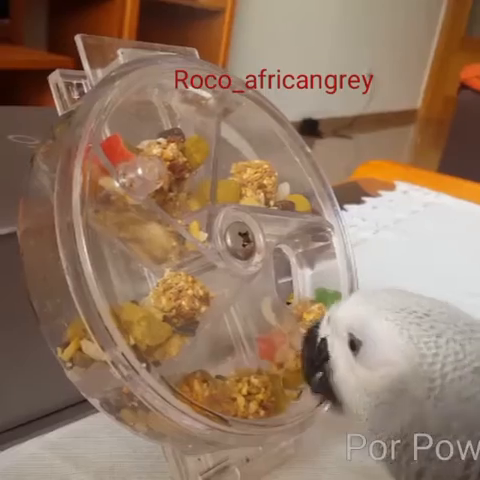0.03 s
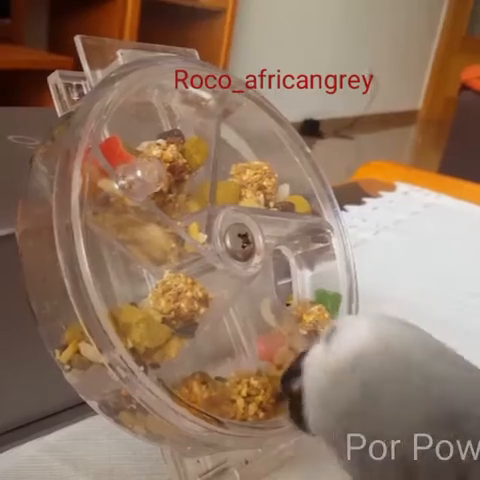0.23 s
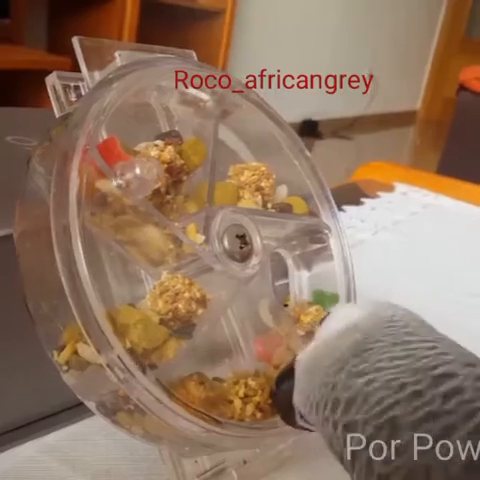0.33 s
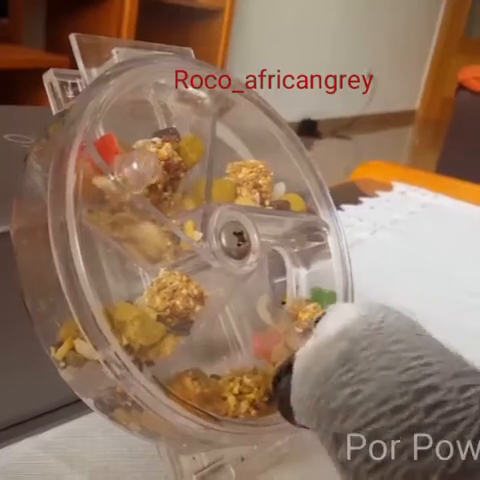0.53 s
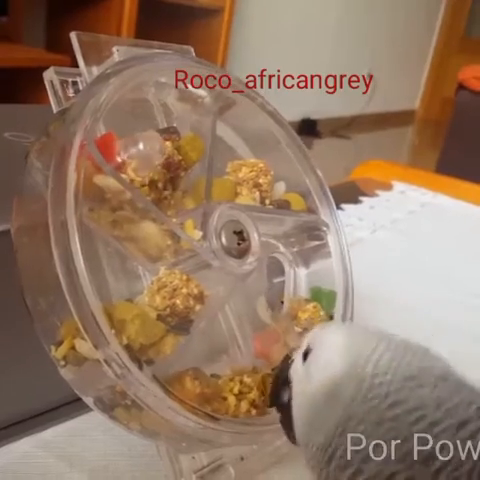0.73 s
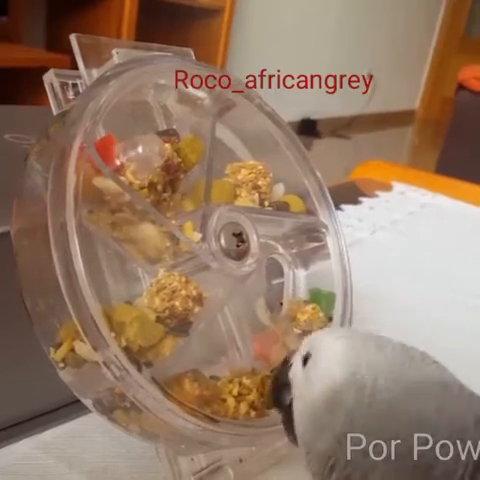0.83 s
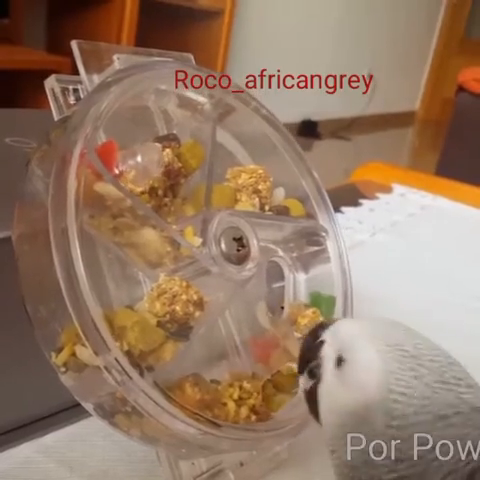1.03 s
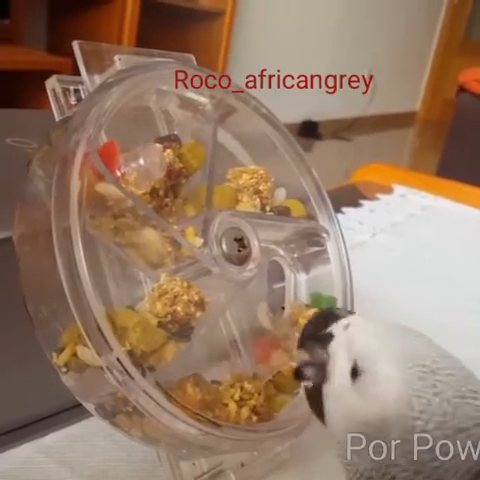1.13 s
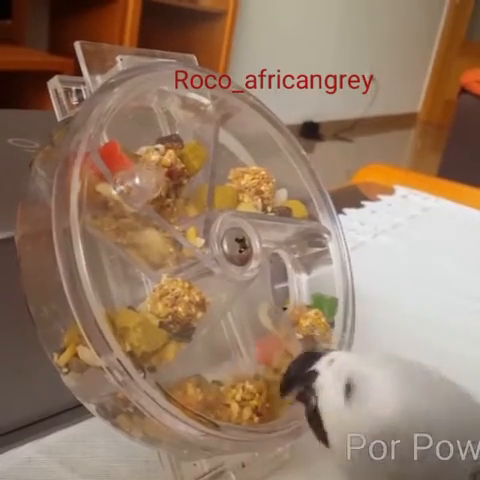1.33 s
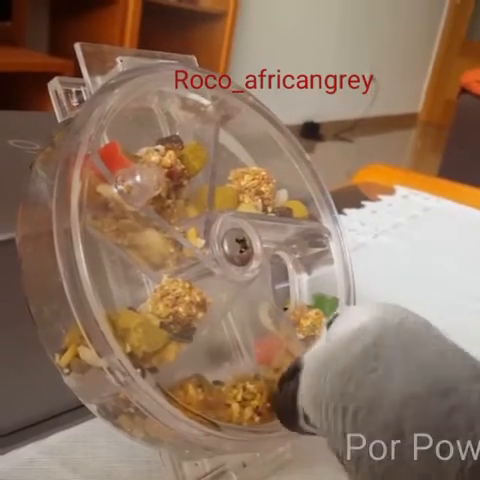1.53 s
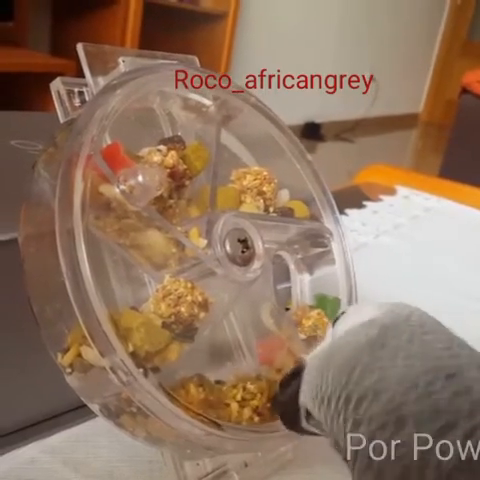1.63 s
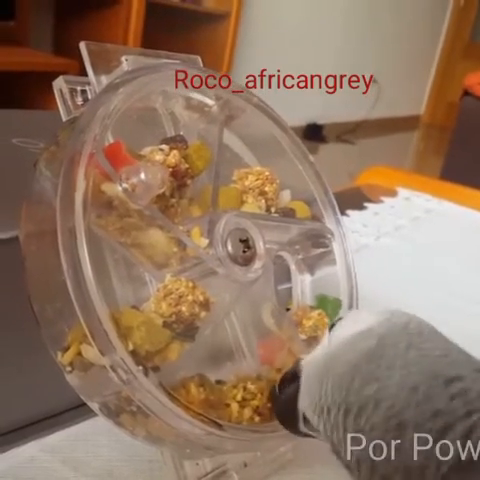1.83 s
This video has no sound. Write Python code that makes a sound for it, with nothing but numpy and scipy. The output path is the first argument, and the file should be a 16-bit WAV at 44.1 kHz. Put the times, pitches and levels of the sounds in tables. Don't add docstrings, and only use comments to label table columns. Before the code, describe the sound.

Hollow plastic knocks and bright clicks from a beak on a nut-filled wheel, first a dense loud clatter, then sparser hits and lighter taps, with faint room tone, heard close in a small indoor space.

```python
import sys
import numpy as np
from scipy import signal
from scipy.io import wavfile
from scipy.ndimage import map_coordinates

SR = 44100
rng = np.random.default_rng(int(sys.argv[2]) if len(sys.argv) > 2 else 0)


def master_out(mix):
    frames = np.transpose(np.atleast_2d(mix))
    ceiling = np.clip(frames, -1, 1)
    pcm = np.round(ceiling * 32767).astype(np.int16)
    wavfile.write(sys.argv[1], SR, pcm)


def gain_from_db(level_db):
    decades = np.asarray(level_db, float) / 20
    return 10 ** decades


N = 83790

# pitch in Hz, level in dB, t60 in seconds.
TABLE = [(171.2, -2.5, 0.087), (199.3, -5, 0.23), (350, -14.5, 0.035)]
# pitch in Hz, level in dB, t60 in seconds.
DRUM = [(558, -8.5, 0.038), (638.4, -7, 0.054), (681.5, -4.5, 0.029), (716.7, -10.5, 0.048)]
# pitch in Hz, level in dB, t60 in seconds.
UPPER = [(1061.3, 2.5, 0.049), (1226.6, 1.5, 0.027), (1304, -0.5, 0.033), (1502, -18.5, 0.046),
         (1723, -7.5, 0.026)]
# pitch in Hz, level in dB, t60 in seconds.
RIM = [(1930, -2, .025), (2250, -6, .015), (2590, 1, .018), (2890, -2, .022), (3120, -5, .02),
       (3800, -3, .013), (4400, -6, .013), (5120, -8, .015)]
TABLE_BAND_HZ, SHELL_BAND_HZ, RIM_BAND_HZ = [107.4, 630], [503, 3700], [2350, 6200]


def rms_one(x):
    return x / np.sqrt(np.mean(x ** 2) + 1e-20)


def at_hz(points, hz):
    table_hz, value = np.transpose(points)
    return np.interp(np.log(hz), np.log(table_hz), value)


def over_time(points):
    return gain_from_db(np.interp(np.arange(N) / SR, *np.transpose(points)))


def band(x, edges_hz, order=2):
    return signal.sosfilt(signal.butter(order, edges_hz, "band", fs=SR, output="sos"), x)


def clicks_at(s, size):
    return np.bincount((s * SR).astype(int), size, N)


def ring(clicks, hz, t60):
    radius, w = gain_from_db(-60 / (t60 * SR)), 2 * np.pi * hz / SR
    return signal.lfilter([0, np.sin(w)], [1, -2 * radius * np.cos(w), radius * radius], clicks + 1e-18)


def struck(modes, s, db):
    spread_db = 3.0
    out, luck = 0, rng.standard_normal((len(s), len(modes), 2))
    for k, (hz, level_db, t60) in enumerate(modes):
        strength = gain_from_db(db + level_db + spread_db * luck[:, k, 0])
        out = out + ring(clicks_at(s, strength * np.sign(luck[:, k, 1])), hz, t60)
    return out


def burst(s, db, t60, noise):
    return signal.lfilter([1], [1, -gain_from_db(-60 / (t60 * SR))], clicks_at(s, gain_from_db(db))) * noise


def air():
    # frequency in Hz, level in dB.
    floor = [(35, -43), (60, -21), (77, -8.5), (167, -24.5), (206, -19), (278, -25), (999, -34.5),
             (2530, -41), (15500, -46.5)]
    # frequency in Hz, likeness from 0 to 1.
    likeness = [(60, 0.97), (240, 0.9), (950, 0.2), (3770, 0.06), (15000, -0.01)]
    out, edges = 0, 22 * 2 ** np.arange(0, 9.6, .5)
    white = rng.standard_normal((2, 2, N + SR // 2))
    for k, (low, high) in enumerate(zip(edges, edges[1:])):
        mid, side = band(white[k % 2], [low, high])[:, -N:]
        hz = np.sqrt(low * high)
        alike = np.clip(at_hz(likeness, hz), 0, 1)
        ports = np.sqrt(1 + alike) * mid + np.sqrt(1 - alike) * side * [[1], [-1]]
        out = out + gain_from_db(at_hz(floor, hz)) * ports
    return gain_from_db(-68) * rms_one(out)


def rumble():
    # time in seconds, level in dB.
    handling = [(.5, -62), (1.1, -78), (1.9, -75)]
    noise = band(rng.standard_normal(N + SR), [22, 44])[SR:]
    return over_time(handling) * rms_one(noise)


def nuts():
    # time in seconds, level in dB.
    shaking = [(0,-89),(0.216,-77),(0.259,-53),(.43,-56.5),(.46,-60.5),(.58,-58.5),(.61,-70),(0.796,-57),(0.872,-82),(.92,-58),(1.059,-63.5),(1.199,-78),(1.3,-61.5),(1.42,-61.5),(1.5,-55),(1.67,-64.5)]
    hits_per_s, spread_db = 700, 3.0
    s = np.flatnonzero(rng.random(N) < hits_per_s / SR) / SR
    db = spread_db * np.minimum(rng.exponential(1, N), 3)[:len(s)]
    body = 0
    for modes, part_db, edges_hz in [(TABLE, -0.5, TABLE_BAND_HZ), (DRUM, 2.5, SHELL_BAND_HZ),
                                     (UPPER, 0, SHELL_BAND_HZ), (RIM, -13, RIM_BAND_HZ)]:
        damped = np.array(modes) * [1, 1, 0.24]
        body = body + gain_from_db(part_db) * rms_one(band(struck(damped, s, db), edges_hz))
    grit = rms_one(burst(s, db, 0.087, rng.standard_normal(N)))
    rub = gain_from_db(-6) * band(grit, [1500, 5000], order=1)
    return over_time(shaking) * (body + rub)


def pings():
    # time in seconds, peak in dB, pitch in Hz, t60 in seconds.
    rim_pings = [(0.1187, -67, 3030, 0.018), (0.2335, -31.5, 3990, 0.026), (0.241, -40, 2930, 0.055),
                 (0.2725, -56, 2980, 0.019), (0.8842, -38, 2730, 0.022), (0.313, -54.5, 4565, 0.18),
                 (0.4674, -51, 2420, .02), (0.485, -46, 2260, 0.032), (0.5457, -49, 2880, 0.022),
                 (0.567, -54, 2900, 0.022), (0.6235, -50.5, 2740, 0.04), (0.634, -41, 2480, 0.042),
                 (0.648, -55.5, 2880, 0.048), (0.7363, -54, 2100, .015), (0.748, -54.5, 2780, 0.041),
                 (0.75, -51, 6180, .04), (0.7612, -46.5, 2250, 0.058), (0.762, -56.5, 3840, .025),
                 (0.7845, -53, 2830, 0.033), (1.2431, -35, 2650, 0.017), (1.2445, -48, 3660, 0.017),
                 (1.2765, -45, 2880, 0.032), (1.3673, -47, 2634, 0.018), (1.4412, -38, 3350, 0.027),
                 (1.4425, -38.5, 3960, 0.014), (1.5659, -52.5, 2530, 0.028)]
    # time in seconds, peak in
    # dB, pitch in Hz, t60 in seconds.
    shell_taps = [(0.104, -57.5, 1510, 0.022), (0.2765, -35, 1320, 0.035), (0.467, -26, 1100, 0.021),
                  (0.468, -28.5, 450, 0.074), (0.2238, -25, 1365, 0.023), (0.8846, -27, 1223, 0.041),
                  (0.8855, -24.5, 644, 0.07), (1.2445, -29, 1352, 0.047), (0.636, -36, 664, 0.046),
                  (0.651, -42, 1170, 0.038), (0.763, -36.5, 1460, 0.081), (0.7845, -35.5, 1324, 0.037),
                  (0.7845, -31.5, 726, 0.031), (1.048, -52, 1137, 0.11), (1.143, -58, 1110, 0.023),
                  (1.196, -47, 1073, .02), (1.244, -31, 632, 0.13), (1.2503, -25.5, 650, 0.062),
                  (1.441, -40, 515, 0.062), (1.503, -40, 1140, 0.036), (1.5855, -36, 1114, 0.031),
                  (1.759, -54, 690, 0.021), (1.851, -39, 1213, 0.029)]
    echo_s, echo = 0.001036, 0.56
    out = 0
    for s, db, hz, t60 in [*rim_pings, *shell_taps]:
        touches = clicks_at(np.array([s, s + echo_s]), gain_from_db(db) * np.array([1, echo]))
        out = out + ring(touches, hz, t60)
    return band(out, [SHELL_BAND_HZ[0], 9000])


def knocks():
    # time in seconds, peak in dB, upper shell in
    # dB, crack in dB.
    contacts = [(0.105, -56, -4.5, -15), (0.225, -17.5, -3.5, -11.5), (0.233, -19.5, -1, -7),
                (0.24, -17.5, -7.5, -30), (0.246, -11.5, -16, -26), (0.272, -24.5, -2.5, -11),
                (0.282, -30, -19, -20), (0.312, -30, -5.5, -13), (0.318, -25, -10.5, -21),
                (0.342, -31, -5, -36), (0.372, -32, -35, -36), (0.392, -26.5, -26, -49),
                (0.419, -35, -5.5, -17), (0.467, -18.5, -12.5, -27), (0.484, -26, -18, -30),
                (0.506, -32, -5.5, -30), (0.516, -26, -14.5, -31), (0.542, -27.5, -11, -27),
                (0.55, -33.5, -4.5, -16), (0.568, -28.5, -9, -40), (0.6225, -28.5, -4.5, -25),
                (0.633, -24, -9, -21.5), (0.642, -25, -12, -32), (0.659, -28, -10, -28),
                (0.7358, -26, -22.5, -44), (0.761, -35, -10, -17), (0.786, -31, -2.5, -29),
                   (0.8755, -38, -4.5, -35), (0.8845, -26, -20, -10), (0.8885, -21, -4.5, -16.5),
                   (0.893, -26.5, -13, -27), (0.901, -19, -12.5, -55), (1.015, -39.5, 1, -43),
                   (1.044, -54, 10, -5), (1.08, -33.5, -30, -46), (1.142, -50, -2, -30),
                   (1.197, -53.5, 4, -25), (1.243, -28, 0, -6.5), (1.247, -31.5, -3.5, -11.5),
                   (1.251, -25, -8.5, -50), (1.2766, -38, 3, -16), (1.281, -20, -16.5, -37),
                   (1.35, -32, -3.5, -24.5), (1.36, -37, -0.5, -31), (1.367, -35, 1, -17),
                (1.442, -31, -10, -11.5), (1.465, -26, -23, -30), (1.474, -31.5, -13.5, -28),
                  (1.486, -30, -17, -29), (1.499, -37, -5.5, -40), (1.511, -38, -0.5, -8),
                  (1.538, -42.5, -5, -32), (1.567, -29, -15.5, -32), (1.585, -24, -15, -49),
                  (1.607, -39, -3, -30), (1.624, -34, -17, -34), (1.68, -39, -26, -32),
                  (1.705, -34, -15, -27), (1.723, -35.5, -7, -13.5), (1.759, -38.5, -13, -38),
                  (1.771, -34, -22, -20.5), (1.784, -39, -13, -19), (1.852, -43, 6, -10.5),
                  (1.891, -29, -11.5, -30)]
    chatter_s, chatter_loss_db = 0.001721, 1
    rows = np.repeat(np.array(contacts), 3, axis=0)
    s, db, upper_db, crack_db = rows.T
    touch = np.arange(len(s)) % 3
    s = s + chatter_s * touch * (1 + (rng.random(len(s)) - .5) / 2)
    db = db - chatter_loss_db * touch
    shell = struck(DRUM, s, db - 10) + struck(UPPER, s, db + upper_db - 10)
    first_s, crack_db = s[::3], (db + crack_db)[::3]
    rim = band(struck(RIM, first_s, crack_db - 3.5), RIM_BAND_HZ)
    crack = burst(first_s, crack_db - 2, .035, rng.standard_normal(N))
    buzz = gain_from_db(-31) * sum(gain_from_db(level_db) * ring(crack, hz, t60) for hz, level_db, t60 in RIM)
    return band(shell, SHELL_BAND_HZ) + rim + band(buzz, RIM_BAND_HZ) + band(crack, [1500, 5700])


def scrapes():
    # start in seconds, length in seconds, level in dB, top frequency in Hz.
    strokes = [(0.167, 0.039, -59.5, 6240), (0.25, 0.12, -58, 5800), (0.49, 0.061, -62.5, 7000),
               (0.735, 0.047, -57, 6500), (0.9, 0.051, -75, 3970), (0.999, 0.081, -65, 6200),
               (1.407, 0.11, -64, 8900)]
    edge_s = 0.027
    t, out = np.arange(N) / SR, 0
    lumps = rng.exponential(1, N // 64 + 1).repeat(64)[:N]
    grit = rng.standard_normal(N) * lumps + rng.standard_normal((2, N))
    for s, length, db, top_hz in strokes:
        swell = np.clip(np.minimum(t - s, (s + length - t) / 2) / edge_s, 0, 1)
        rough = band(gain_from_db(db) * swell * grit, [1800, top_hz], order=1)
        out = out + band(rough, [900, 2 * top_hz], order=1)
    return out


def snaps():
    # time in seconds, peak in dB.
    ticks = [(0.2248, -38), (0.2348, -36), (0.518, -59), (0.545, -52.5), (0.6211, -56), (0.752, -64),
             (1.359, -59), (1.443, -50.5), (1.5122, -55), (1.548, -58), (1.5765, -56), (1.7074, -57),
             (1.7227, -58.5)]
    s, db = np.transpose(ticks)
    shared, left, right = rng.standard_normal((3, N))
    noise = shared / 2 + np.array([left, right])
    return band(burst(s, db + 3.5, 0.023, noise), [4500, 10000], order=1)


def stand():
    # time in seconds, peak in dB.
    thuds = [(0.235, -31.5), (0.288, -42), (0.337, -45.5), (0.4, -40.5), (0.473, -37), (0.508, -39.5),
             (0.551, -38.5), (0.632, -44), (0.666, -42), (0.748, -37.5), (0.761, -51.5), (0.779, -49),
             (0.883, -45), (0.892, -34), (1.246, -47.5), (1.279, -48), (1.353, -45), (1.48, -40.5),
             (1.538, -35), (1.59, -38.5), (1.712, -43)]
    s, db = np.transpose(thuds)
    return band(struck(TABLE, s, db - 2.5), TABLE_BAND_HZ, order=3)


def creaks():
    # start in seconds, length in seconds, level in dB, first and last slips per second.
    slips = [(1.453, 0.0473, -50, 355, 270)]
    t, out = np.arange(N) / SR, 0
    for s, length, db, first_hz, last_hz in slips:
        part = np.clip((t - s) / length, 0, 1)
        turn = 2 * np.pi * length * (first_hz * part + (last_hz - first_hz) * part ** 2 / 2)
        tone = np.sin(turn) + gain_from_db(7) * np.sin(2 * turn) + gain_from_db(-7) * np.sin(3 * turn)
        out = out + gain_from_db(db) * np.sin(np.pi * part) * tone
    return out


def room(x):
    t60_s, wall_cut_hz = 0.34, 5100
    out, dull = np.zeros((2, N)), np.exp(-2 * np.pi * wall_cut_hz / SR)
    for k, lag in enumerate((rng.uniform(.008, .03, 12) * SR).astype(int)):
        loop, gain, state = x.copy(), gain_from_db(-60 * lag / SR / t60_s), [0.]
        for i in range(lag, N, lag):
            back, state = signal.lfilter([gain * (1 - dull)], [1, -dull], loop[i - lag:i], zi=state)
            loop[i:i + lag] += back[:N - i]
        out[k % 2] += (loop - x) * (-1) ** (k // 2)
    return out


def scene():
    left_db, right_lag_s, right_shade = 1.5, .00009, .28
    toy = knocks() + nuts() + stand() + snaps() + scrapes() + pings() + creaks()
    toy = toy - .68 * band(toy, [770, 960], order=1)
    late = map_coordinates(toy[1], [np.arange(N) - right_lag_s * SR], order=3)
    late = late - right_shade * band(late, [2400, 16000], order=1)
    near = (np.array([toy[0], late]) + rumble()) * gain_from_db([[left_db], [-left_db]])
    walls = room(band(toy[0], [830, 15000], order=1))
    return near + gain_from_db(-16.5) * walls + air()


def top_cut(x):
    return signal.sosfilt(signal.butter(12, 16430, fs=SR, output="sos"), x)


def record(dry):
    dipped = dry - .4 * band(dry, [8600, 10600], order=1)
    cut = signal.sosfilt(signal.cheby2(12, 60, 16200, fs=SR, output="sos"), dipped)
    return top_cut(cut)


dry = scene()
out = record(dry)
master_out(out)
```